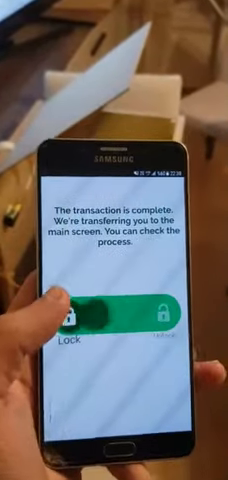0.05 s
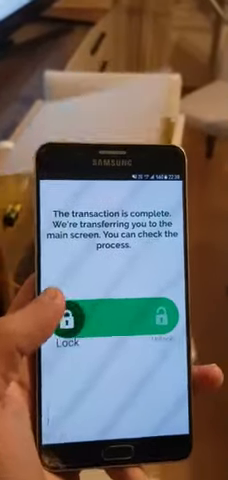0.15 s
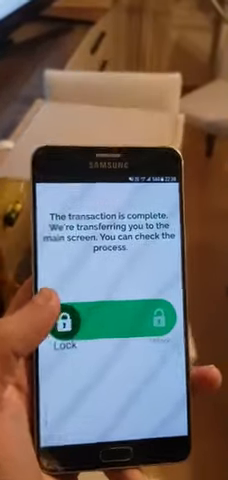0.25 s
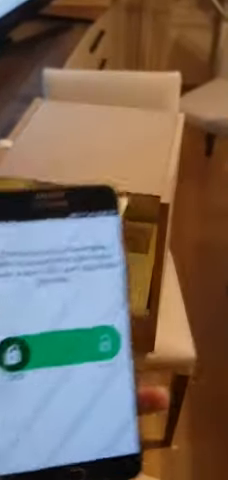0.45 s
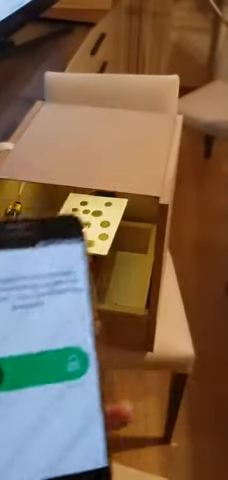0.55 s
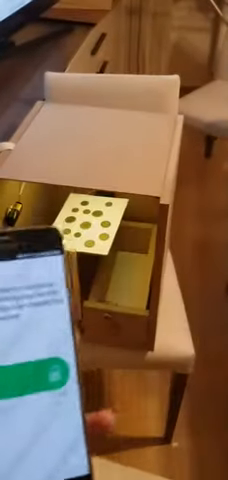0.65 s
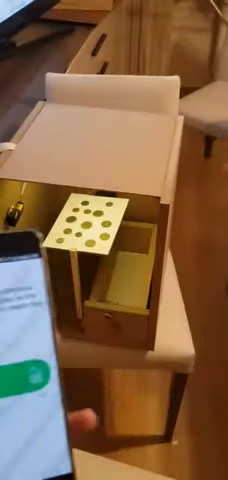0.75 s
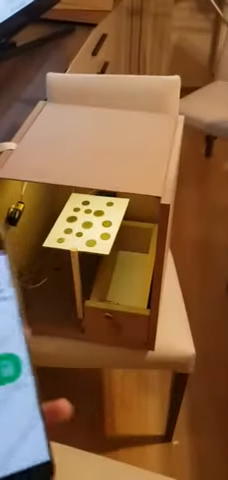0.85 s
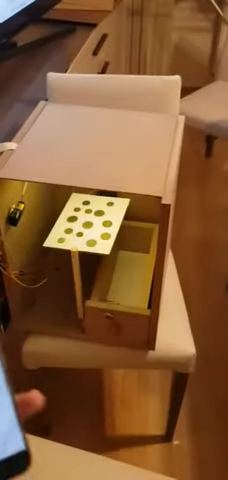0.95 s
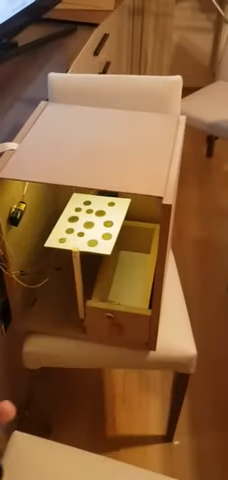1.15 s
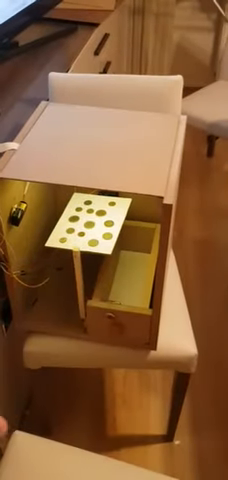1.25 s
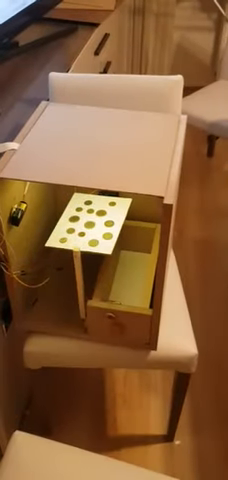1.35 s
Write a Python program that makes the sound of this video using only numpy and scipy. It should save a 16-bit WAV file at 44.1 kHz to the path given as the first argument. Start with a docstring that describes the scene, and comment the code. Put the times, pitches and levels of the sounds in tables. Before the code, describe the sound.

A sudden clatter in a wooden box, close by in a small room. A plate swings down with a scrape and brief low hum, its load lands and rebounds, and only faint room noise and hand rustle remain.

```python
"""A scrape and a rising hum, then a hard double crash in a wooden drawer, in a small room.
A plate comes off its catch inside a wooden box and swings down, rubbing, on a squeaking hinge.
Its load drops into the drawer: a knock, the crash, a rebound with a sharp metal snap, a few soft bumps.
Each blow thumps the box and cracks on its thin panels. The room rings for half a second;
then only low room noise and the faint rustle of a hand remain."""
import sys
import numpy as np
from scipy import signal
from scipy.fft import rfft, irfft
from scipy.io import wavfile

SR = 44100
rng = np.random.default_rng(int(sys.argv[2]) if len(sys.argv) > 2 else 0)


def store_pcm(level_fs):
    """Save levels as 16-bit WAV."""
    pcm = np.round(np.clip(level_fs, -1, 1) * 32767).astype(np.int16)
    wavfile.write(sys.argv[1], SR, np.atleast_2d(pcm).T)


N = 61739
T = np.arange(N) / SR
FREQS = np.fft.rfftfreq(N, 1 / SR)
BOTH_EARS = np.ones((2, 1))
BLOW_LOW_CUT_HZ, PLATE_LOW_CUT_HZ = 190.6, 430


def from_db(db):
    """Decibels to gain."""
    return 10 ** (np.asarray(db) / 20)


def rms_one(x):
    """Scale to unit power."""
    return x / np.sqrt(np.mean(x ** 2) + 1e-20)


def in_time(rows):
    """The columns of a curve at every sample."""
    times, *columns = np.transpose(rows)
    return [np.interp(T, times, column) for column in columns]


def during(rows):
    """A gate, open from the first to the last point of a curve."""
    return (T >= rows[0][0]) * (T <= rows[-1][0])


def at_hz(points, hz):
    """Read a table on a log-frequency axis."""
    freqs, values = np.transpose(points)
    return np.interp(np.log(hz + 1), np.log(freqs), values)


def colour(x, spectrum):
    """EQ a steady signal with (frequency [Hz], level [dB]) points; unit power."""
    return rms_one(irfft(rfft(x) * from_db(at_hz(spectrum, FREQS)), N))


def low_cut(x, hz):
    """Roll off the lows at 18 dB an octave."""
    return signal.sosfilt(signal.butter(3, hz, "high", fs=SR, output="sos"), x)


def stereo_noise():
    """White noise, centred in the bass and wide in the treble."""
    # likeness of left and right: (frequency [Hz], correlation [0..1])
    likeness = [(60, .98), (270, .96), (400, 0.61), (650, 0.3), (2000, 0.076), (15000, 0.067)]
    alike = at_hz(likeness, FREQS)
    mid, side = rfft(rng.standard_normal((2, N)))
    return rms_one(irfft(np.sqrt(1 + alike) * mid + np.sqrt(1 - alike) * side * [[1], [-1]], N))


def flutter(depth_db, hz):
    """A gain that varies at random, up to about hz times a second; unit power."""
    slow = signal.sosfilt(signal.butter(2, hz, fs=SR, output="sos"), rng.standard_normal(N))
    return rms_one(from_db(depth_db * np.clip(rms_one(slow), -2, 2)))


def decay(t60):
    """An exponential fall of 60 dB in t60 seconds."""
    return np.exp(-np.log(1000) * T / t60)


def ringing(modes):
    """Dying sines, one row for each mode."""
    return np.array([from_db(db) * decay(t60) * np.sin(2 * np.pi * hz * T) for hz, db, t60 in modes])


def after(x, start_s):
    """Delay a stereo sound."""
    return np.pad(x, ((0, 0), (int(start_s * SR), 0)))[:, :N]


def placed(x, pan_db, lag_s=0):
    """A source on the left is louder there and reaches the right ear later."""
    return np.array([from_db(pan_db) * x[0], from_db(-pan_db) * np.interp(T - lag_s, T, x[1])])


def room_tone():
    """Low room noise over a steady drone."""
    # spectrum of the quiet room: (frequency [Hz], level [dB])
    floor_eq = [(20, -30), (46, 0.5), (72, -15.5), (105, -3.5), (160, -8), (260, -13), (700, -30.5),
                (1400, -33), (2300, -37.5), (3400, -48.5), (14000, -53.5)]
    drone = from_db(-53) * np.sin(2 * np.pi * 47.6 * T)
    return from_db(-58.5) * colour(stereo_noise(), floor_eq) + drone


def rumble_and_swish():
    """A dull low rumble dying away at the start, and a bright swish near the end."""
    # envelopes: (time [s], rumble level [dB], swish level [dB])
    levels = [(0, -48, -104), (.09, -47, -78.5), (.6, -68, -100), (1.1, -84, -100), (1.26, -73, -80.5),
              (1.32, -73, -66), (1.4, -75.5, -79.5)]
    # spectra of rumble and swish: (frequency [Hz], level [dB])
    rumble_eq = [(100, -2.5), (260, 7.5), (350, -4.5), (600, -13), (1300, -8), (2200, -15.5), (3400, -39.5)]
    swish_eq = [(3000, -20), (4600, 2), (7000, -9), (9500, -11), (13000, 0), (16000, -20.5)]
    rumble_db, swish_db = in_time(levels)
    rumble = from_db(rumble_db) * colour(stereo_noise(), rumble_eq)
    return rumble + from_db(swish_db) * colour(stereo_noise(), swish_eq)


def plate_scrape():
    """Dense tiny slips make a woody body and a hiss; they and one knock set the plate ringing."""
    # scrape envelopes: (time [s], body level [dB], hiss level [dB])
    levels = [(.085, -75.5, -90), (.108, -42.5, -45.5), (.135, -35, -41), (.165, -41.5, -44.5),
              (.2, -43.5, -45.5), (.228, -29, -32.5), (.27, -32, -31), (.293, -25.5, -28.5),
              (.315, -47, -48.5), (.36, -78.5, -91.5)]
    # spectra of body and hiss: (frequency [Hz], level [dB])
    body_eq = [(60, -34.5), (300, -3), (610, -11.5), (790, -5), (1050, 1.5), (1420, -3.5), (2100, 3.5),
               (2900, -8), (3600, -14), (8000, -32.5)]
    hiss_eq = [(1500, -39.5), (3500, -4), (5000, 0), (7200, 3.5), (9000, -8.5), (11500, -0.5), (15500, -14)]
    # modes of the plate: (frequency [Hz], relative level [dB], t60 [s])
    plate_modes = [(385, -2.5, 0.026), (491, -4.5, 0.089), (698, -5, 0.027), (761, -1, 0.086),
                   (838, -2.5, 0.07), (1166, -10, 0.28), (1428, -4, .045)]
    slips_per_s, spread_db = 5000, 2.5
    body_db, hiss_db = in_time(levels)
    slips = (rng.random((2, N)) < slips_per_s / SR) * rng.choice([-1, 1], (2, N))
    slips = slips * from_db(spread_db * np.minimum(rng.exponential(1, (2, N)), 4))
    polarity = np.resize([1, -1], len(plate_modes))
    plate = low_cut(polarity @ ringing(plate_modes), PLATE_LOW_CUT_HZ) * BOTH_EARS
    rubbed_ring = rms_one(signal.fftconvolve(slips, plate, axes=1)[:, :N])
    body = from_db(body_db) * (colour(slips, body_eq) + from_db(-5) * rubbed_ring)
    hiss = from_db(hiss_db) * colour(slips, hiss_eq)
    sizzle_db = -31.5 + 2.6 * (hiss_db - hiss_db.max())  # the top end swells faster than the hiss
    sizzle = from_db(sizzle_db) * rms_one(low_cut(stereo_noise(), hz=10200))
    knock = from_db(-18.5) * after(plate, start_s=.2058)
    return body + hiss + sizzle + knock


def swing_hum():
    """A slightly rough tone that rises as the plate gathers speed, judders and winds down."""
    # hum of the swing: (time [s], pitch [Hz], level [dB])
    swing = [(.1194, 184.6, -68), (.1667, 210.1, -39), (.2003, 231.9, -29.5), (.234, 253.2, -24),
             (.2458, 252.4, -48), (.2673, 247.5, -23.5), (.3339, 252.2, -38), (.3787, 229.6, -28.5),
             (.4039, 240.5, -23), (.4406, 237.8, -26.5), (.4791, 208.6, -40.5), (.5302, 202.3, -36.5),
             (.65, 205.4, -60)]
    hz, db = in_time(swing)
    roughness = 1 + .099 * colour(rng.standard_normal(N), [(40, 7), (200, -34), (2000, -91)])
    tone = np.sqrt(2) * np.sin(2 * np.pi * np.cumsum(hz) / SR)
    return during(swing) * from_db(db) * tone * roughness * BOTH_EARS


def catch_release():
    """The catch lets go with a small hollow knock."""
    # modes of the catch: (frequency [Hz], level [dB], t60 [s])
    catch_modes = [(865, -29.5, 0.04), (957, -27.5, 0.054)]
    knock = low_cut(ringing(catch_modes).sum(0), PLATE_LOW_CUT_HZ)
    return after(knock * BOTH_EARS, start_s=.1295)


def metal_snaps():
    """Metal meets metal: a sharp bright edge, a burst of a few milliseconds and a short jingle."""
    # hard contacts: (time [s], snap gain [dB], jingle gain [dB], pan to the left [dB])
    contacts = [(0.2061, -16.5, -22, 1), (0.2943, -5.5, -12, 1.5), (.2980, 2.5, 4, 3),
                (0.3036, -13.5, -8, 5), (0.3767, -2, -3.5, 1.5), (0.3796, -3.5, -9.5, 2.5)]
    # spectrum of burst and jingle: (frequency [Hz], level [dB])
    metal_eq = [(1500, -0.5), (4000, -4.5), (7500, -6.5), (9000, -9.5), (11000, 3.5), (12500, 2.5),
                (16000, -4)]
    edge = from_db(-5) * low_cut(1.0 * (T == 0), hz=5000)
    burst = from_db(-8) * decay(t60=.0035)
    jingle = from_db(-21) * decay(t60=.1)
    out = 0
    for start_s, snap_db, jingle_db, pan_db in contacts:
        envelope = from_db(snap_db) * burst + from_db(jingle_db) * jingle
        snap = from_db(snap_db) * edge + envelope * colour(stereo_noise(), metal_eq)
        out += placed(after(snap, start_s), pan_db)
    return out


def drawer_blows():
    """Each blow thumps the box and crunches on its panels; returns the thump and crack layers."""
    # blows of the load: (time [s], thump gain [dB], contact time [s], crack gain [dB])
    blows = [(0.2065, -27, 0.00048, -14.5), (.2940, -12, .0012, -6.5), (.2971, -4, 0.00077, -2),
             (.3022, -14, .0007, -6), (.3084, -13.5, .0008, -14), (0.3295, -16, .0011, -21),
             (.3760, -1, 0.00352, -13), (.3809, -7.5, 0.0023, -8.5), (0.3946, -11.5, 0.0025, -28),
             (0.4333, -12, 0.0033, -39), (0.442, -13.5, 0.00287, -26.5)]
    # low modes, the box's short boom and the room's longer ring: (frequency [Hz], level [dB], t60 [s])
    thump_modes = [(120.2, -21.5, 0.17), (169.2, -16.5, 0.48), (196, -7, 0.085), (230.6, -8.5, 0.097),
                   (257, -16.5, 0.48), (304, -2.5, .095), (385, -19.5, 0.23), (485, -19, 0.31)]
    # modes of the thin panels: (frequency [Hz], level [dB], t60 [s])
    panel_modes = [(720, -22.5, .13), (770, -23.5, .13), (837, -25.5, 0.057), (914, -25.5, .12),
                   (1275, -24, 0.18), (1472, -27, .08), (1542, -26.5, 0.15), (2118, -29.5, .12),
                   (2586, -29, .08), (2865, -31, 0.068)]
    # spectrum of the woody crunch: (frequency [Hz], level [dB])
    crunch_eq = [(200, -7.5), (400, 3.5), (560, -4), (750, 3), (1050, -6), (1400, 3.5), (2600, -4),
                 (3600, -11.5), (7000, -17), (15000, -31)]
    sway = from_db(-37) * decay(t60=.49) * np.sin(2 * np.pi * 41 * T)  # the box rocks on its stand
    boom = low_cut(ringing(thump_modes).sum(0), BLOW_LOW_CUT_HZ) + sway
    panels = low_cut(ringing(panel_modes), BLOW_LOW_CUT_HZ)
    thump = crack = 0
    for start_s, thump_db, contact_s, crack_db in blows:
        push = np.sin(np.pi * T[T < contact_s] / contact_s) + 1e-9  # longer contact, rounder thump
        body = signal.lfilter(push / push.sum(), 1, boom) * BOTH_EARS
        crunch = decay(t60=.055) * flutter(depth_db=4.5, hz=900) * colour(stereo_noise(), crunch_eq)
        panel_ring = rng.choice([-1, 1], (2, len(panels))) @ panels
        thump += from_db(thump_db) * after(body, start_s)
        crack += from_db(crack_db) * after(panel_ring + from_db(-8.5) * crunch, start_s)
    return thump, low_cut(crack, hz=110)


def hinge_squeak():
    """The hinge sticks and slips: a rough, fluttering tone that arches down into the crash."""
    # squeak of the turning hinge: (time [s], pitch [Hz], level [dB])
    glide = [(.215, 2608, -46.5), (.26, 2967, -34.5), (.274, 2860, -31.5), (.29, 2615, -36.5),
             (.308, 2623, -27), (.322, 2424, -30.5), (.34, 2400, -52.5)]
    hz, db = in_time(glide)
    waver = 1 + .045 * colour(rng.standard_normal(N), [(200, -.5), (600, -12.5), (3000, -51)])
    tone = np.sqrt(2) * np.sin(2 * np.pi * np.cumsum(hz * waver) / SR)
    return during(glide) * from_db(db) * flutter(depth_db=3.5, hz=300) * tone


def hand_brushes():
    """Each brush of the hand swells and fades, with a low part and a dry, grainy rub."""
    # strokes of the hand: (start [s], rise [s], fall [s], low level [dB], rub level [dB])
    strokes = [(.86, .07, .07, -67, -69), (.94, .04, .11, -61, -90), (1.154, .008, .1, -72, -72)]
    # spectra of the low part and the rub: (frequency [Hz], level [dB])
    low_eq = [(60, -25), (110, -1), (260, 6), (480, -15.5), (800, -45.5)]
    rub_eq = [(700, -22), (1450, 0.5), (2300, 1), (2900, -19), (7000, -36.5)]
    low = colour(stereo_noise(), low_eq)
    rub = colour(stereo_noise(), rub_eq) * flutter(depth_db=3, hz=83)
    out = 0
    for start, rise, fall, low_db, rub_db in strokes:
        swell = np.interp(T, [start, start + rise, start + rise + fall], [0, 1, 0])
        out += swell * (from_db(low_db) * low + from_db(rub_db) * rub)
    return out


def room_response():
    """A diffuse tail that builds up quickly and dies octave by octave; unit energy."""
    # reverb time of the small room: (frequency [Hz], t60 [s])
    reverb_times = [(100, 0.92), (250, .5), (800, .35), (2000, .46), (5000, 0.35), (14000, 0.19)]
    build_s = .016
    noise = rfft(stereo_noise())
    centres = np.geomspace(60, 15360, 9)
    tail = 0
    for centre, share in zip(centres, np.eye(len(centres))):
        octave = irfft(noise * at_hz(np.c_[centres, share], FREQS), N)
        tail += octave * decay(at_hz(reverb_times, centre))
    return rms_one(tail * (1 - np.exp(-T / build_s))) / np.sqrt(N)


def scene():
    """Four buses feed the room over a quiet bed of noise: thump and scrape sit a little to the left, the crack
    slightly to the right, and the snaps keep their own placing."""
    # by bus: pan to the left [dB], lag at the right ear [s], reverb send [dB]
    pan_db = dict(thump=1.63, crack=-0.5, scrape=1.23)
    lag_s = dict(thump=.0001, crack=.00015, tick=.0004, scrape=.00033)
    send_db = dict(thump=-17.5, crack=-8.5, tick=-6, scrape=-6.5)
    room = room_response()
    thump, crack = drawer_blows()
    buses = dict(thump=thump + swing_hum(), crack=crack, tick=metal_snaps(),
                 scrape=plate_scrape() + hinge_squeak() + catch_release())
    direct = sum(placed(x, pan_db.get(name, 0), lag_s[name]) for name, x in buses.items())
    send = sum(x * from_db(send_db[name]) for name, x in buses.items())
    reverb = signal.fftconvolve(send, room, axes=1)[:, :N]
    bed = placed(room_tone() + rumble_and_swish() + hand_brushes(), pan_db=.75)
    return direct + reverb + bed


def record(dry):
    """Soft saturation rounds the highest peaks; a steep low-pass cuts the very top."""
    lowpass = signal.ellip(10, .2, 80, 15900, fs=SR, output="sos")
    return signal.sosfilt(lowpass, np.tanh(dry / 1.226))


dry = scene()
out = record(dry)
store_pcm(out)
```